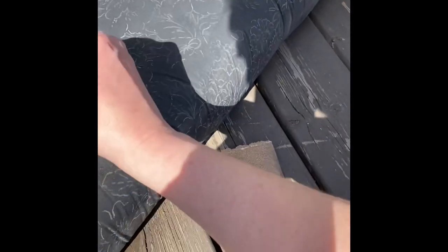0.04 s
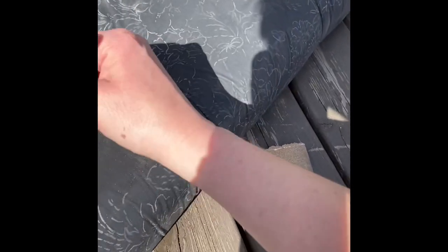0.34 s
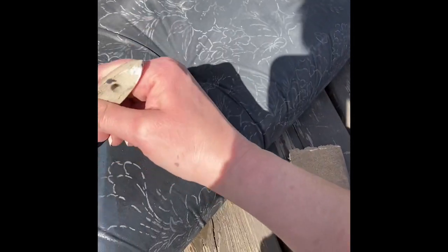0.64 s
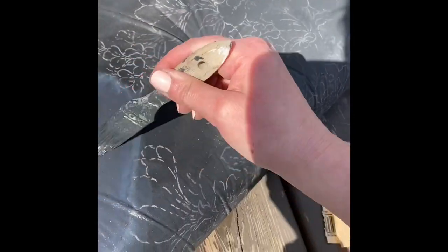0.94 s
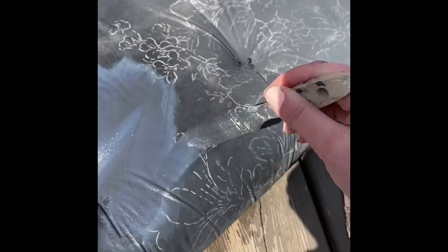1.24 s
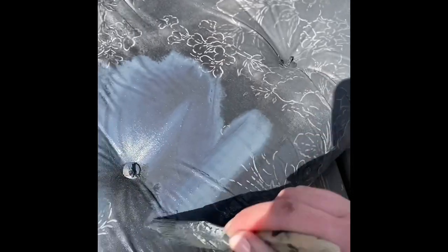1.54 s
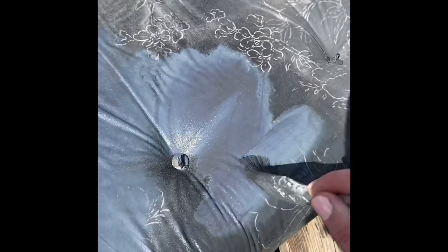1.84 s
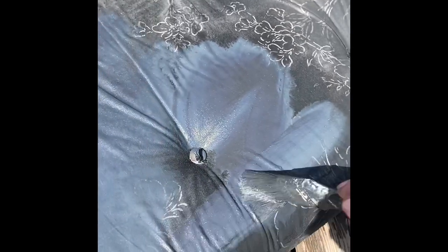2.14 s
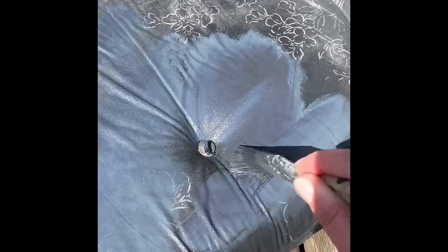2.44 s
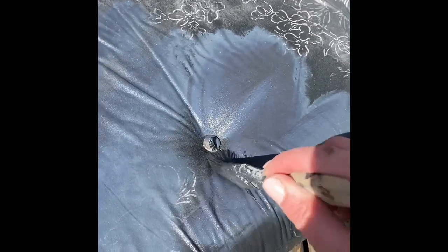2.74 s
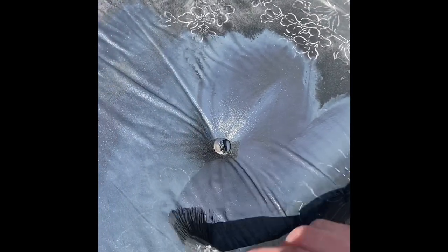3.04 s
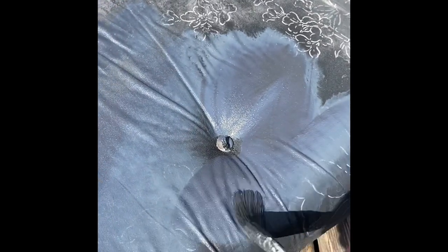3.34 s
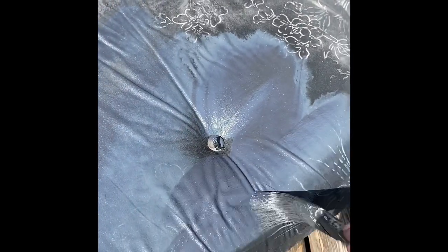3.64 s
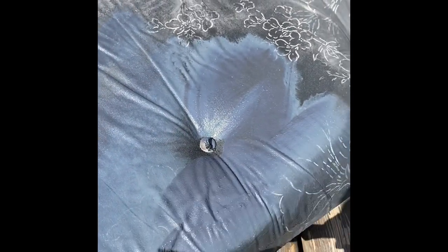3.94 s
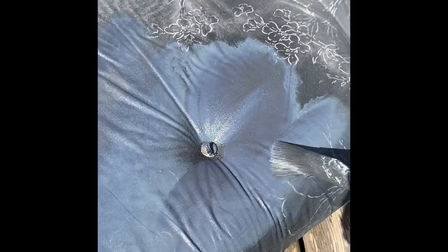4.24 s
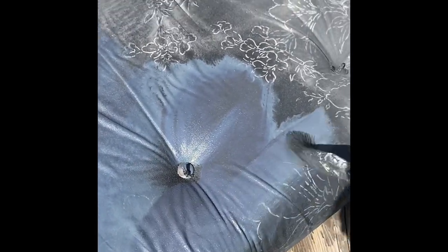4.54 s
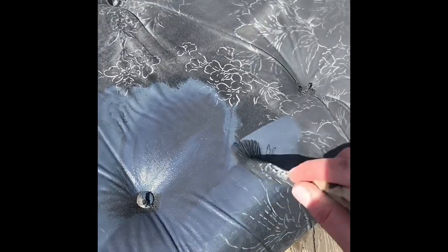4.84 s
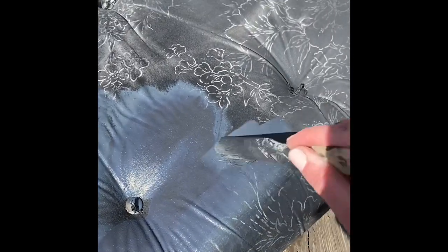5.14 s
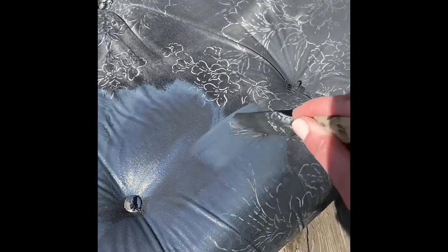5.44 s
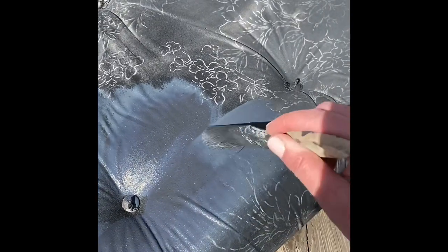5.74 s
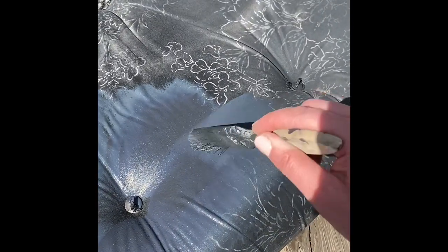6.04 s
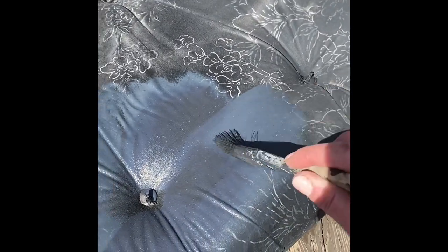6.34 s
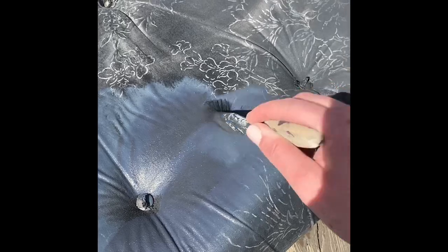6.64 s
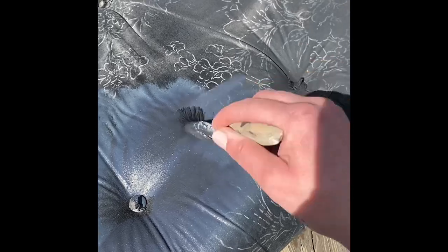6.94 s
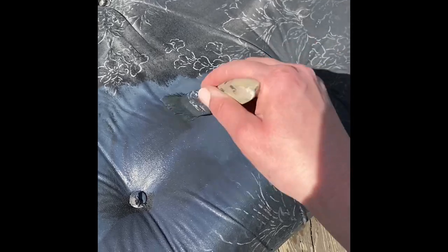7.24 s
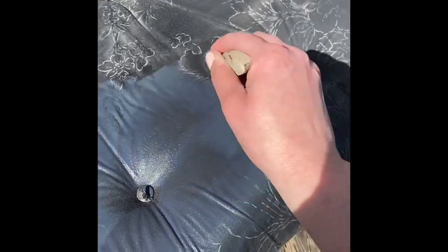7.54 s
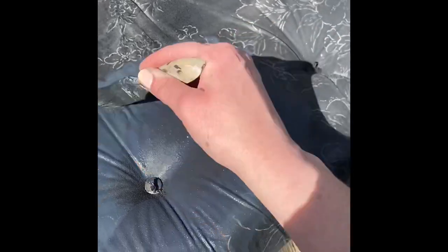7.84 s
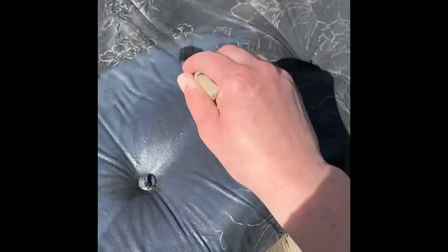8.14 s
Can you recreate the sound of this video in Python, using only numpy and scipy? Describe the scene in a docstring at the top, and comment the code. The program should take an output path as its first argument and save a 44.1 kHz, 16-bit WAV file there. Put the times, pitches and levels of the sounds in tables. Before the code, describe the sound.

Close, scratchy brush strokes hiss over taut padded cloth outdoors, with occasional pops and soft low bumps above a faint hum.

```python
"""Paintbrush on a deck cushion

Outdoors on a deck, close to a hand-held camera, a paintbrush scrubs to and fro over a stiff, painted
fabric cushion. The bristles hiss and rasp as they slip on the weave, the padding rustles below, and
now and then the taut cloth pops. Soft low bumps reach the microphone, mostly at first; from about
three seconds in, a distant motor drones over the faint rumble of the yard."""
import sys
import numpy as np
from scipy import signal
from scipy.fft import rfft, irfft
from scipy.io import wavfile
from scipy.ndimage import uniform_filter1d

SR = 44100
rng = np.random.default_rng(int(sys.argv[2]) if len(sys.argv) > 2 else 0)


def waveform_to_disk(signal):
    """Save audio, clipped to [-1, 1], as 16-bit WAV at the path in sys.argv[1]."""
    frames = np.transpose(np.atleast_2d(signal))
    scaled = np.clip(frames, -1, 1) * 32767
    samples = np.round(scaled).astype(np.int16)
    wavfile.write(sys.argv[1], SR, samples)


N = 361179
TIME, HZ = np.arange(N) / SR, np.fft.rfftfreq(N, 1 / SR)


def gain_of(db):
    """Decibels to an amplitude factor."""
    return 10 ** (np.asarray(db) / 20)


def unit_rms(x):
    """Scales a signal to rms 1."""
    return x / np.sqrt(np.mean(x ** 2) + 1e-20)


def over_time(points):
    """Joins (time_s, value) points into one value a sample."""
    return np.interp(TIME, *np.transpose(points))


def over_frequency(points):
    """Joins (frequency_hz, value) points on a log-frequency axis."""
    hz, value = np.transpose(points)
    return np.interp(np.log(HZ + 1), np.log(hz + 1), value)


def add(mix, start_s, sound):
    """Mixes a sound in at start_s, or at zero if that is negative."""
    part = mix[max(round(start_s * SR), 0):][:len(sound)]
    part += sound[:len(part)]


def wander(rate_hz):
    """A random curve of rms 1 that moves mostly below rate_hz."""
    return unit_rms(irfft(rfft(rng.standard_normal(N)) / (1 + (HZ / rate_hz) ** 4), N))


def coloured(x, spectrum):
    """Gives a signal a spectrum that falls away below its first point, at rms 1."""
    skirt = 1 / np.sqrt(1 + (spectrum[0][0] / (HZ + 1)) ** 4)
    return unit_rms(irfft(rfft(x) * gain_of(over_frequency(spectrum)) * skirt, N))


# How alike left and right sound: frequency_hz, coherence (0-1)
STEREO_COHERENCE = [(100, .955), (750, .92), (1500, .995), (2200, .97), (2900, .55), (3900, .86),
                    (4500, .7), (5000, .95), (9000, .93), (10300, .98), (12000, .93), (15000, .9)]
# Left-right phase offset by frequency, rising in uneven steps, which widens the treble hiss:
# frequency_hz, left_lead_rad
STEREO_PHASE = [(0, 0), (950, -.25), (1800, 0), (2240, .1), (2760, -.4), (3270, 1.15), (3900, .4),
                (4500, .9), (4950, .05), (6100, 1.7), (7000, 2.9), (8000, 3.6), (8400, 4.35), (9300, 5.0),
                (9800, 6.2), (10900, 6.35), (11700, 7.65), (12300, 8.1), (13000, 9.3), (13900, 9.6),
                (14700, 10.6), (15800, 11.65)]
# Left-right balance: frequency_hz, left_minus_right_db
STEREO_BALANCE = [(100, -.2), (1000, -.6), (2300, 0), (2900, -4.5), (3500, -.3), (6000, .7), (9000, 0)]
def stereo_spread(pair):
    """Two unrelated signals become left and right: alike in the bass, wide in the treble."""
    shared, separate = rfft(pair)
    coherence = np.clip(over_frequency(STEREO_COHERENCE), 0, 1)
    lean = gain_of(over_frequency(STEREO_BALANCE) / 2)
    lead_rad = np.interp(HZ, *np.transpose(STEREO_PHASE))
    right = (coherence * shared + np.sqrt(1 - coherence ** 2) * separate) * np.exp(-1j * lead_rad)
    return irfft(np.array([shared * lean, right / lean]), N)


# Brush strokes close to the camera, each lasting until the next turn: start_s, level_db,
# top_speed_at (0-1 of the stroke), swell_db, hold_s, brake_s, turn_rub_db, sizzle_db
STROKES = [(0.0, -48, 0.45, 1, 0.073, 0.011, -64.5, -3.0),
           (0.194, -49.5, 0.17, 3.0, 0.027, 0.009, -65.0, -7.0),
           (0.348, -49.0, 0.6, 1.5, 0.055, 0.004, -58.0, -11),
           (0.549, -47.5, 0.66, 6.5, 0.013, 0.012, -64, -6),
           (0.687, -50, 0.19, 4.5, 0.045, 0.018, -66.0, -4),
           (0.964, -46.5, 0.49, 10.5, 0.021, 0.004, -63.5, -3),
           (1.103, -47.2, 0.22, 10.0, 0.062, 0.014, -57.0, -14.0),
           (1.262, -49.5, 0.45, 3, 0.035, 0.05, -63.5, -13.0),
           (1.497, -51.5, 0.51, 3, 0.024, 0.013, -71, -10),
           (1.699, -51, 0.38, 9, 0.033, 0.038, -66.5, -10.0),
           (2.003, -49, 0.64, 4, 0.021, 0.0073, -70, -12.0),
           (2.157, -49.5, 0.53, 1, 0.035, 0.012, -74, -11.0),
           (2.308, -50.5, 0.28, -1, 0.038, 0.023, -69.0, -3.0),
           (2.427, -50, 0.28, 3, 0.035, 0.008, -57.0, -11), (2.548, -54, 0.31, -2, 0.024, 0.004, -70, -9),
           (2.64, -50.5, 0.44, -1.5, 0.029, 0.013, -65, -12),
           (2.745, -43, 0.63, 9.0, 0.091, 0.008, -68, -2.0),
           (2.845, -47.5, 0.23, 16, 0.011, 0.013, -63, -17), (3.089, -50, 0.53, 6, 0.028, 0.004, -65, -2),
           (3.238, -47, 0.35, 10.5, 0.03, 0.029, -67.5, -14), (3.445, -53, 0.3, 3, 0.046, 0.019, -74, -3),
           (3.667, -52.5, 0.35, 5, 0.071, 0.012, -77, -2),
           (3.981, -49.5, 0.56, 2, 0.057, 0.025, -76, -10.0),
           (4.389, -41.5, 0.9, 5.5, 0.12, 0.022, -71, -7.0),
           (4.555, -47.5, 0.2, 1.5, 0.035, 0.0072, -65.0, -12.0),
           (4.702, -44.5, 0.88, 8, 0.008, 0.004, -54, -10.0),
           (4.822, -48, 0.44, -1.5, 0.048, 0.011, -64.0, -4.0),
           (4.933, -45, 0.77, 10, 0.021, 0.004, -62.0, 0),
           (5.054, -43.5, 0.48, 5.0, 0.04, 0.0055, -66.5, -4),
           (5.193, -42, 0.44, 7.0, 0.046, 0.012, -60, -3),
           (5.329, -43.5, 0.35, 8.0, 0.046, 0.007, -63.5, 1),
           (5.491, -41.5, 0.71, 6.5, 0.059, 0.009, -66.5, -7),
           (5.659, -45, 0.53, 4.5, 0.038, 0.005, -65.0, -2),
           (5.798, -42.8, 0.48, 4.5, 0.065, 0.013, -59.5, 0),
           (5.954, -49, 0.65, 7, 0.03, 0.005, -64.0, -2.0), (6.132, -46, 0.4, 7.5, 0.047, 0.011, -62.5, -1),
           (6.321, -45.5, 0.36, 7, 0.053, 0.01, -63.5, -4),
           (6.539, -46.5, 0.37, -3.5, 0.025, 0.013, -53, -3),
           (6.657, -46.5, 0.47, 3.5, 0.042, 0.01, -60.5, 5),
           (6.784, -41.2, 0.5, 5.5, 0.071, 0.007, -63.5, 0), (6.918, -48.5, 0.67, 2, 0.043, 0.004, -68, 6),
           (7.04, -40.5, 0.67, 3, 0.075, 0.019, -60.0, 0), (7.178, -41, 0.38, 4.5, 0.082, 0.025, -69, 6),
           (7.299, -45, 0.72, 9.5, 0.008, 0.005, -65, -3), (7.428, -44.5, 0.46, 6, 0.055, 0.013, -70.0, 2),
           (7.56, -42, 0.4, 6.0, 0.054, 0.027, -69, -3.0), (7.767, -43, 0.45, 8.5, 0.05, 0.08, -63.5, 5),
           (8.005, -41.0, 0.52, 10.0, 0.057, 0.015, -62.0, -12)]
# The tuft snags on a crease and scrapes harder: start_s, length_s, extra_db
SNAGS = [(.135, 0.044, 3.5), (.527, .02, 4), (0.754, 0.073, 3), (0.863, 0.071, 3), (4.754, .018, 5.5),
         (4.796, 0.014, 1), (7.69, 0.025, 0.5), (7.839, .022, 3.5), (7.899, .02, 3)]
LAST_TURN_S, USUAL_STROKE_DB = 8.27, -45
def brush_strokes(grip_power=1.22, bend_s=0.006):
    """Scraping strength (1 for a usual stroke): the tuft takes hold, swells to top speed and brakes."""
    scrape, snag_db = np.zeros(N), np.zeros(N)
    starts, *_, turn_rub_db, _ = np.transpose(STROKES)
    ends = [*starts[1:], LAST_TURN_S]
    for (start, db, top_speed_at, swell_db, hold_s, brake_s, *_), end in zip(STROKES, ends):
        span, length_s = slice(int(start * SR), int(end * SR)), end - start
        t = np.clip(TIME[span] - start, 0, length_s)
        arch = np.interp(t / length_s, [0, top_speed_at, 1], [0, 0.5, 1])
        hold = 1 - np.exp(-(t / hold_s) ** 2)
        brake = np.tanh((length_s - t) / brake_s) ** grip_power
        scrape[span] = gain_of(db - swell_db * np.cos(np.pi * arch) ** 2) * hold * brake
    for start, length_s, extra_db in SNAGS:
        add(snag_db, start, extra_db * np.hanning(int(length_s * SR)))
    # The brush lifts at some turns and rubs on through others; the tuft needs bend_s to follow.
    turn_rub = gain_of(np.interp(TIME, starts, turn_rub_db))
    scrape = np.hypot(scrape * gain_of(snag_db), turn_rub)
    return uniform_filter1d(scrape, size=round(bend_s * SR)) / gain_of(USUAL_STROKE_DB)


def flicks(per_s, spread_db):
    """Bristles or creases flicking free: sparse clicks of random sign and size."""
    sizes = gain_of(spread_db * np.minimum(rng.exponential(1, N), 3)) * rng.choice([-1, 1], N)
    return unit_rms(sizes * (rng.random(N) < per_s / SR))


def friction(spectrum, catching, clicks, grit_db, patchy_db, click_share=0.3):
    """Two noises of countless small slips, bunched where the tuft catches; the first carries clicks."""
    noise = signal.stft(rng.standard_normal((2, N)), nperseg=512)[2]
    # Both share drifting patches of colour, some 300 Hz by 60 ms.
    patches = uniform_filter1d(rng.standard_normal(noise.shape[1:]), size=4, axis=0)
    patches = unit_rms(uniform_filter1d(patches, size=11, axis=1))
    patchy = signal.istft(noise * gain_of(patchy_db * patches), nperseg=512)[1][:, :N]
    slips = unit_rms(patchy * gain_of(grit_db * catching))
    slips[0] += click_share * clicks
    return coloured(slips, spectrum)


def fold_resonances(sound, ripple_db=1.25, spacing_hz=330, slide=0.1, full_above_hz=1450):
    """Each stroke meets other folds, whose faint resonances slide one way out and the other way back."""
    hz, t, frames = signal.stft(sound, SR, nperseg=512)
    turns_s = [row[0] for row in STROKES] + [LAST_TURN_S]
    stroke, progress = np.divmod(np.interp(t, turns_s, np.arange(len(turns_s))), 1)
    knots_hz = np.arange(0, SR / 2, spacing_hz)
    ripples = rng.standard_normal((len(turns_s), len(knots_hz)))
    colour = [np.interp(hz * (1 + slide * (-1) ** k * (along - 0.5)), knots_hz, ripples[k])
              for k, along in zip(stroke.astype(int), progress)]
    depth_db = ripple_db * np.clip(hz[:, None] / full_above_hz, 0, 1)
    return signal.istft(frames * gain_of(depth_db * np.transpose(colour)), SR, nperseg=512)[1][:, :N]


# Close-up spectra of the bristle tips, weave, taut cloth and padding: frequency_hz, density_db
TIP_HISS = [(1500, -39), (2600, -1), (3400, 1), (4400, 1.5), (5400, 0.4), (6500, -3), (9000, -3.5),
            (11500, -7), (15500, -4)]
TIP_FIZZ = [(3500, -33), (5300, 13.5), (6500, 3.5), (8700, 10), (11200, 6), (15500, 2.5)]
TIP_SIZZLE = [(8000, -21), (10000, -8), (11800, 3), (13300, -3), (15000, 3), (15800, 4), (17000, -20)]
WEAVE_RASP = [(900, -9), (1450, -4), (2150, 0.5), (2700, -2.5), (3800, -30)]
CLOTH_DRUM = [(250, -32), (550, -3.5), (950, 0.5), (1200, -3), (1500, -8), (2400, -21)]
PADDING_RUSTLE = [(70, 4.5), (150, -3.5), (200, -1), (290, 2), (420, 0), (600, -13), (1200, -37)]
# How hard the hand leans on the brush: time_s, pressure_db
HAND_PRESSURE = [(0, 0), (.8, 3), (1.15, -1.5), (1.6, -2.5), (2.6, 2.5), (3.3, 0.8), (3.7, 2), (4.5, -2),
                 (5.1, 1.5), (5.5, -1.1), (6.5, 1), (7.2, 1.2), (7.67, 2.5), (7.88, 2.7), (8.19, 0.5)]
# The spot under the brush, from dry rasp (low) to hollow by the cushion's button: time_s, hollow_db
HOLLOWNESS = [(0, 1), (1.6, -0.5), (2.25, 1.5), (2.65, 4.5), (3.2, 0.5), (4.2, -0.5), (5.4, 1.5),
              (5.95, 0.7), (7.1, 1), (7.65, 0.5), (7.9, -1.9), (8.19, 2.5)]
# Rise and fall of the treble fizz: time_s, gain_db
FIZZ_GAIN = [(0, -16), (1.2, -10), (2.1, -3), (3.3, -1.5), (3.9, 5), (4.6, -5), (6.5, -2), (8.19, -1.5)]
def brush(brisk_db=-41, brighten_power=0.38, drag_db=0.75):
    """Close up, tips hiss, weave rasps, cloth drums and padding rustles, all under one uneven drag."""
    scrape, usual = brush_strokes(), gain_of(USUAL_STROKE_DB)
    pressure_db, hollow = over_time(HAND_PRESSURE), gain_of(over_time(HOLLOWNESS))
    starts, *_, sizzle_db = np.transpose(STROKES)
    tips = usual * scrape * gain_of(2.5)
    hiss = tips * gain_of(-0.64)
    briskness = (tips / gain_of(brisk_db)) ** brighten_power  # brisk strokes are brighter
    fizz = tips * briskness * gain_of(over_time(FIZZ_GAIN))
    sizzle = usual * scrape * gain_of(sizzle_db[np.searchsorted(starts[1:], TIME)] - 4)
    rasp = usual * scrape * gain_of(pressure_db - 3.06) / hollow
    drum = usual * scrape * gain_of(pressure_db - 4.56) * hollow
    squeeze = usual * scrape ** 0.58 * gain_of(1.06 * pressure_db - 12.5)
    rustle = gain_of(4.5) * np.hypot(squeeze, cushion_crumples())

    catching = wander(rate_hz=260)
    bristles, creases = flicks(per_s=500, spread_db=3.8), flicks(per_s=120, spread_db=2)
    sound = hiss * friction(TIP_HISS, catching, bristles, grit_db=0.3, patchy_db=1.8, click_share=0.2)
    sound += fizz * friction(TIP_FIZZ, catching, bristles, grit_db=0.3, patchy_db=1)
    sound += sizzle * friction(TIP_SIZZLE, catching, bristles, grit_db=0.5, patchy_db=1)
    sound += rasp * friction(WEAVE_RASP, catching, bristles, grit_db=1, patchy_db=2)
    sound += drum * friction(CLOTH_DRUM, catching, bristles, grit_db=1, patchy_db=2.5)
    sound += rustle * friction(PADDING_RUSTLE, catching, creases,
                               grit_db=1.5, patchy_db=4, click_share=0.64)
    return stereo_spread(fold_resonances(sound) * gain_of(drag_db * wander(rate_hz=20)))


# Low bumps on the microphone and the cushion: start_s, peak_db, pitch_hz
BUMPS = [(-.015, -33, 60.5), (0.128, -29, 52.7), (0.182, -31.5, 80), (0.399, -38, 62.4), (0.558, -31, 60),
         (0.628, -32.5, 173), (0.641, -21, 54.7), (0.702, -31, 54.7), (0.717, -37, 163),
         (0.773, -24.5, 102), (0.816, -25.5, 88), (1.043, -26.5, 58), (1.121, -31.5, 132),
         (1.138, -32.5, 117), (1.231, -40, 122), (1.288, -33, 91), (1.29, -42, 218), (1.813, -36.5, 241),
         (1.841, -37, 191), (2.246, -33.5, 237), (4.263, -37.5, 202), (8.147, -35, 195)]
def bumps(rise=0.33, sag=0.61, right_lag_cycles=0.042):
    """Soft pushes of a few cycles that sag in pitch, a little out of step between left and right."""
    out = np.zeros((2, N))
    for start_s, peak_db, pitch_hz in BUMPS:
        length_s = 0.049 * (55 / pitch_hz) ** 0.93  # higher bumps are shorter
        age = np.arange(0, 3, 1 / (SR * length_s))  # in bump lengths
        swell = (age / rise * np.exp(1 - age / rise)) ** 3
        cycles = np.cumsum(pitch_hz * np.exp(-sag * (age - rise))) / SR
        for side, lag in zip(out, [0, right_lag_cycles]):
            add(side, start_s, gain_of(peak_db) * swell * np.sin(2 * np.pi * (cycles - lag)))
    return out


# Air fluttering at the microphone between the bumps: time_s, level_db
FLUTTER_LEVEL = [(0, -43.5), (0.53, -45.5), (.68, -32.5), (.84, -40), (1.0, -46), (1.25, -50), (1.56, -66),
                 (1.9, -56.5), (2.47, -56), (2.701, -69)]
# Its spectrum: frequency_hz, density_db
FLUTTER_SPECTRUM = [(25, -23), (38, -4), (55, 13), (85, -0.5), (130, -5.5), (210, -17), (500, -62)]
def air_flutter(fade_s=0.2):
    """Moving air makes a low, fluttering noise that dies away early on."""
    fade = np.clip((FLUTTER_LEVEL[-1][0] - TIME) / fade_s, 0, 1)
    air = stereo_spread(coloured(rng.standard_normal((2, N)), FLUTTER_SPECTRUM))
    return gain_of(over_time(FLUTTER_LEVEL)) * fade * air


# The open air around the deck: frequency_hz, density_db
YARD_SPECTRUM = [(20, -22), (40, 9), (70, -8), (120, 2.5), (200, -12.5), (350, -14), (550, -22.5),
                 (950, -18.5), (1500, -40), (6000, -33), (15000, -42)]
def yard_rumble():
    """Faint outdoor rumble, which grows as the motor comes in."""
    level_db = np.interp(TIME, [2.4, 3.1], [-60, -55])
    return gain_of(level_db) * stereo_spread(coloured(rng.standard_normal((2, N)), YARD_SPECTRUM))


# The cushion crumples under the hand: start_s, length_s, relative_db
CRUMPLES = [(0.492, 0.082, -53), (1.37, 0.083, -51.5), (1.792, 0.16, -51.5), (2.052, 0.093, -57),
            (2.36, 0.063, -52.5), (2.538, 0.18, -59), (3.153, 0.1, -54.5), (3.301, 0.097, -52),
            (3.575, 0.041, -52), (3.8, 0.092, -59), (4.068, 0.14, -49), (7.633, 0.14, -54),
            (8.134, 0.073, -55)]
def cushion_crumples():
    """Envelope of the short, dull rustles where the padding gives way."""
    level = np.zeros(N)
    for start_s, length_s, db in CRUMPLES:
        add(level, start_s, gain_of(db) * np.hanning(int(length_s * SR)) ** 0.5)
    return level


# Pops of the taut cloth, close to the camera: time_s, relative_db, snap_hz, spread_octaves, ring_hz
CLOTH_POPS = [(0.534, -36, 800, 0.64, 330), (0.811, -31.5, 746, 0.71, 350), (0.844, -34, 1000, .6, 400),
              (1.388, -41, 300, 1.1, 230), (1.4187, -25.5, 930, 0.76, 302), (1.54, -39.5, 900, 1.4, 480),
              (1.595, -37, 550, .9, 270), (1.632, -27, 490, 0.63, 365), (1.812, -30.5, 750, 1, 342),
              (1.8403, -21.5, 570, 0.74, 302), (1.882, -34.5, 600, 0.82, 350), (1.9, -32, 650, .7, 380),
              (2.2435, -26.5, 1050, 0.91, 280), (2.859, -36.5, 800, .9, 330),
              (3.2273, -34.5, 600, 0.67, 260), (3.325, -31, 1100, 1, 300), (3.548, -35, 650, 0.55, 520),
              (3.6, -33.5, 420, 1.06, 328), (4.099, -37, 330, 0.39, 330), (4.121, -33.5, 280, 0.41, 290),
              (4.144, -32.5, 600, 0.75, 310), (4.151, -35, 250, 0.54, 230), (4.261, -23, 664, 0.54, 262),
              (4.761, -29.5, 1510, 0.89, 300), (8.014, -29.5, 515, 0.67, 403),
              (8.0587, -26.5, 680, 0.78, 398), (8.146, -32, 500, 1.0, 220), (8.16, -29, 480, 0.38, 400),
              (8.169, -33, 280, 0.66, 250)]
def cloth_pops(travel_s=0.003037, lead_s=0.00118, ring_width_hz=75, shiver_s=0.0033, trim_db=-4):
    """A snap travels as a bending wave, highs first, scatters off folds and rings the cloth briefly."""
    t = np.arange(4096) / SR
    out, hz = np.zeros(N), np.fft.rfftfreq(len(t), 1 / SR) + 1
    low_cut = 1 / (1 + (170 / hz) ** 4)
    # Delay falls with the root of frequency; travel_s holds at 1 kHz.
    dispersion = np.exp(-2j * np.pi * 2 * travel_s * np.sqrt(1000 * hz))
    for time_s, db, snap_hz, spread_octaves, ring_hz in CLOTH_POPS:
        snap = np.exp(-0.5 * (np.log2(hz / snap_hz) / spread_octaves) ** 2)
        resonance = gain_of(2) / (1 + 2j * (hz - ring_hz) / ring_width_hz)
        ring = resonance / (1 + (hz / (2 * ring_hz)) ** 2)
        echoes = rng.standard_normal(len(t)) * np.sqrt(t) * np.exp(-t / shiver_s)
        shiver = gain_of(-7) * rfft(echoes / np.linalg.norm(echoes))
        pop = irfft((snap * (1 + shiver) + ring) * low_cut * dispersion)
        add(out, time_s - lead_s, gain_of(db + trim_db) * pop / abs(pop).max())
    return out * gain_of([[-0.4], [0.4]])  # just right of centre


# Main tone of the motor, far from the deck: time_s, pitch_hz, level_db
MOTOR_HUM = [(0, 58.5, -72), (2.6, 58.87, -68), (2.95, 57.5, -53), (5.0, 58.16, -55.5), (6.2, 58.87, -58),
             (6.6, 59.74, -45), (7.15, 59.6, -46.5), (7.55, 57.6, -52), (8.19, 60.7, -50.5)]
# Steadier tones in its drone: pitch_hz, level_db, start_s, end_s
MOTOR_TONES = [(38.2, -54, 2.75, 9), (116.9, -60.5, 2, 9), (90.6, -60.5, 2.94, 5.13)]
def distant_motor(pitch_waver=0.0047, swell_db=1.5, fade_s=0.082):
    """A motor heard from afar: a few low tones that waver in pitch and level."""
    def tone(hz, db):
        cycles = np.cumsum(hz * (1 + pitch_waver * wander(rate_hz=2.1))) / SR
        return np.sqrt(2) * gain_of(db + swell_db * wander(rate_hz=7.3)) * np.sin(2 * np.pi * cycles)
    time_s, hz, db = np.transpose(MOTOR_HUM)
    out = tone(np.interp(TIME, time_s, hz), np.interp(TIME, time_s, db))
    for hz, db, start_s, end_s in MOTOR_TONES:
        out += tone(hz, db) * np.clip(np.minimum(TIME - start_s, end_s - TIME) / fade_s, 0, 1)
    return out


def scene():
    """Brush and cloth close in front, bumps and air at the microphone, motor and yard beyond."""
    return brush() + cloth_pops() + bumps() + air_flutter() + distant_motor() + yard_rumble()


def record(dry):
    """The camera microphone's bass roll-off and the recorder's band limit."""
    low_cut_hz, high_cut_hz = 38.6, 15790
    thinned = irfft(rfft(dry) / np.sqrt(1 + (low_cut_hz / (HZ + 1)) ** 10), N)
    band_limit = signal.firwin(801, high_cut_hz, window=("kaiser", 9), fs=SR)
    return signal.oaconvolve(thinned, band_limit[None], "same")


dry = scene()
out = record(dry)
waveform_to_disk(out)
```